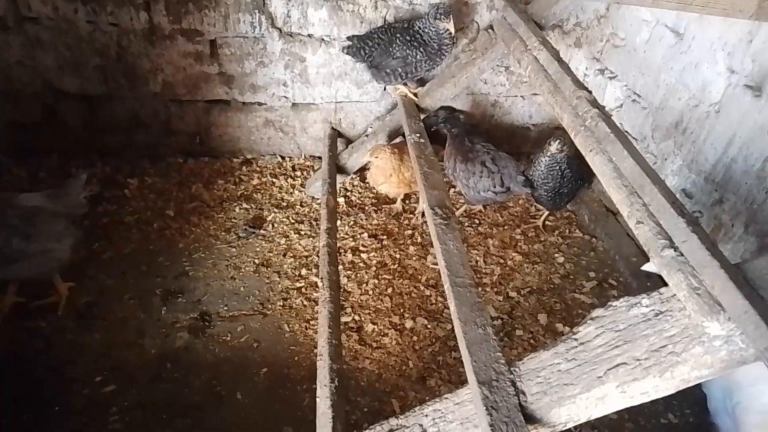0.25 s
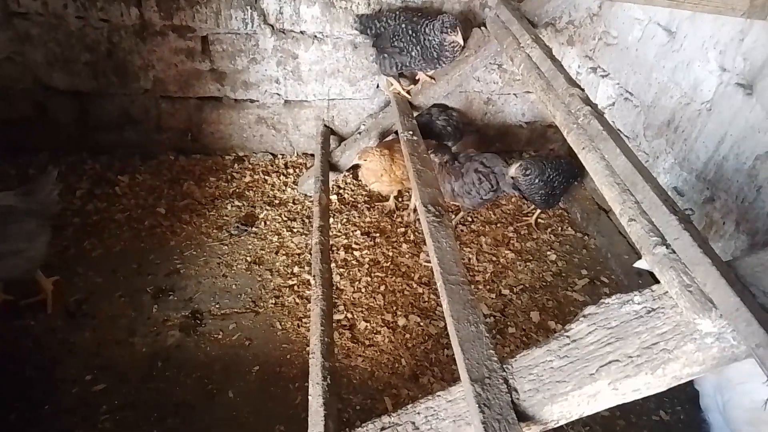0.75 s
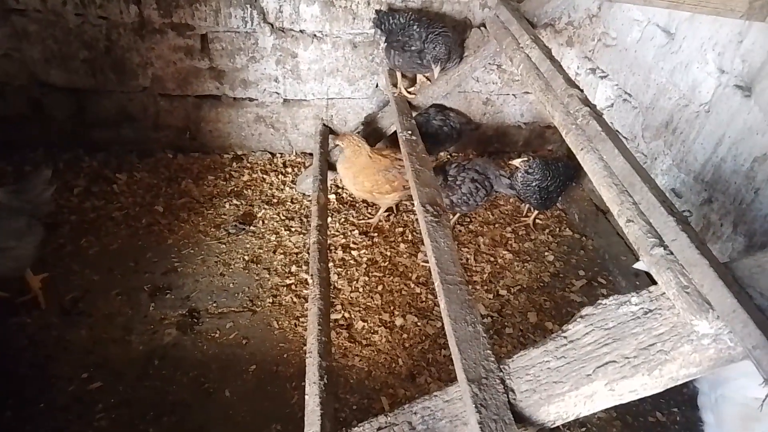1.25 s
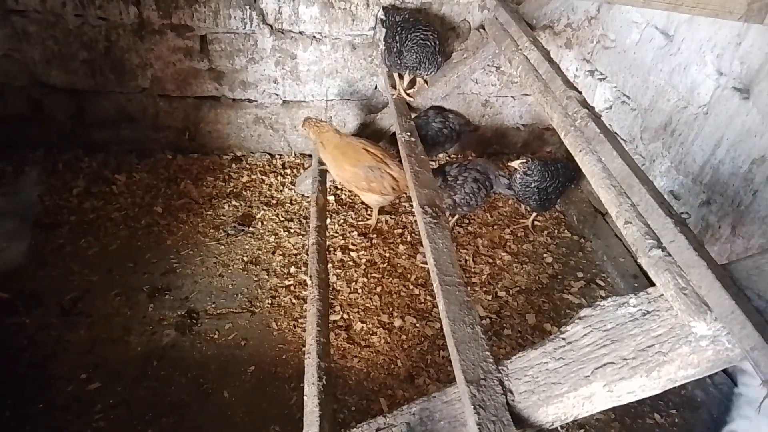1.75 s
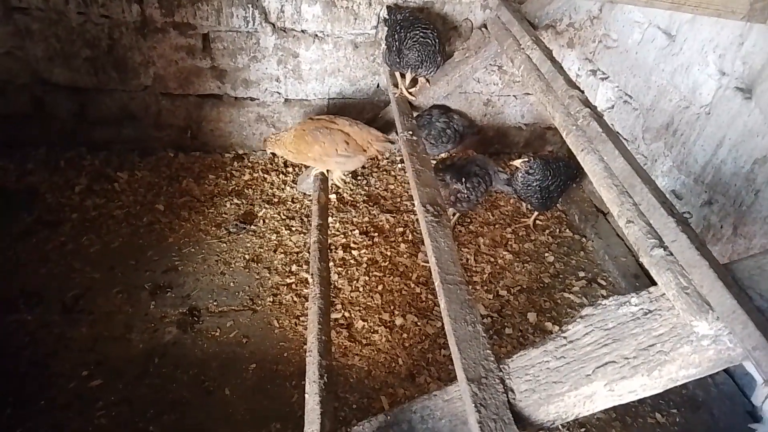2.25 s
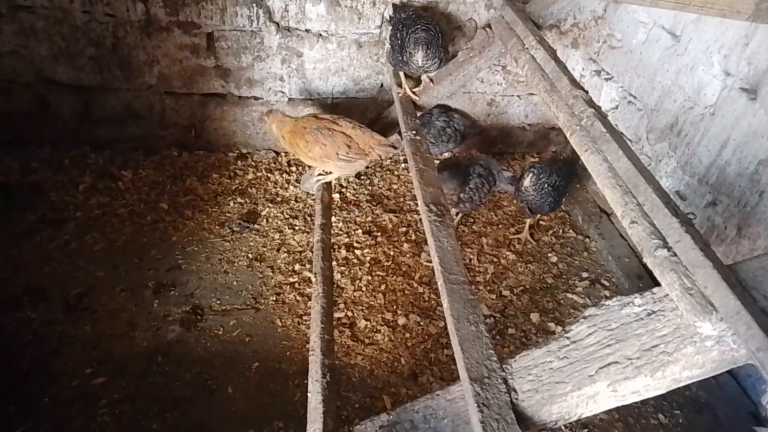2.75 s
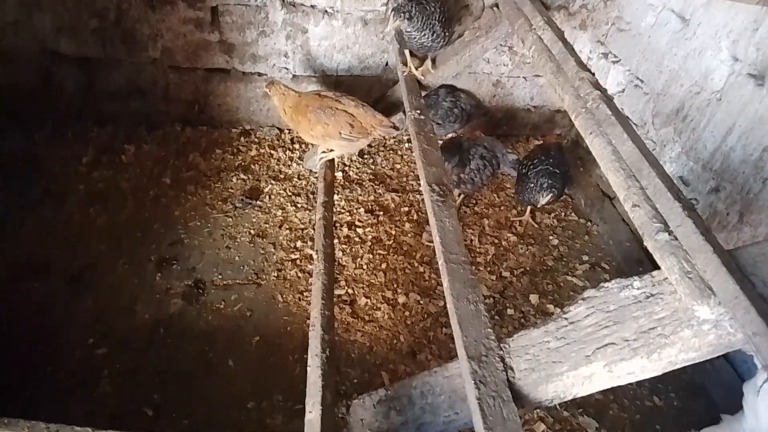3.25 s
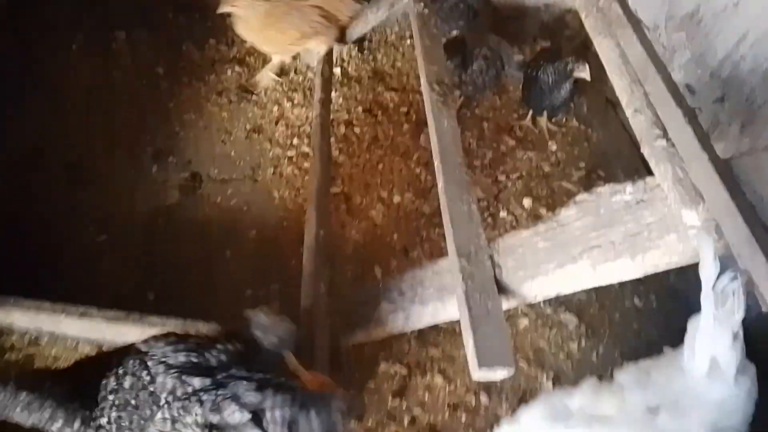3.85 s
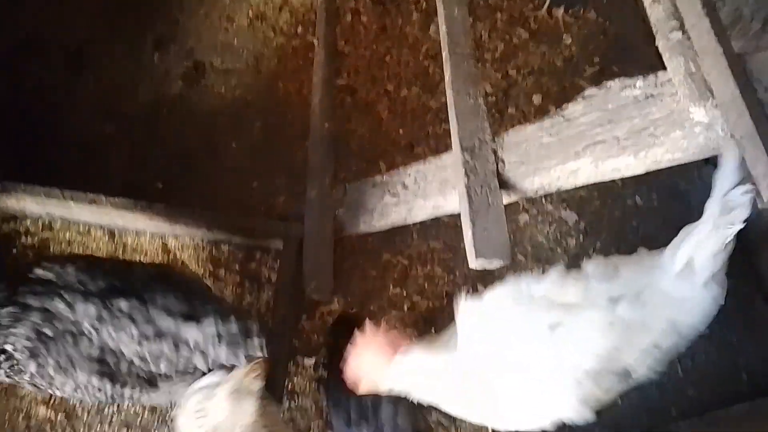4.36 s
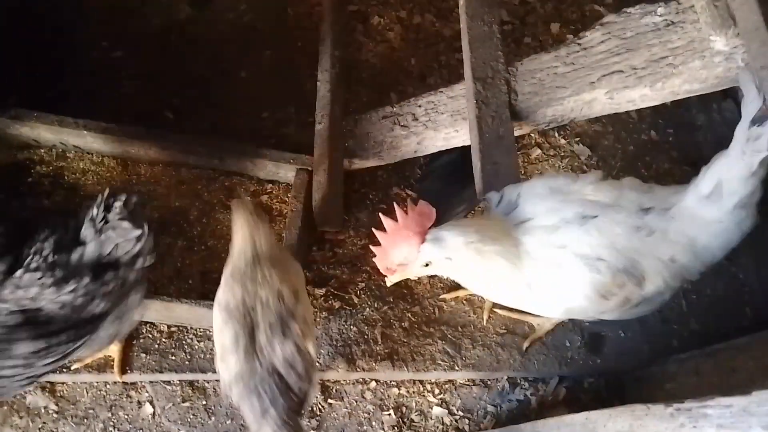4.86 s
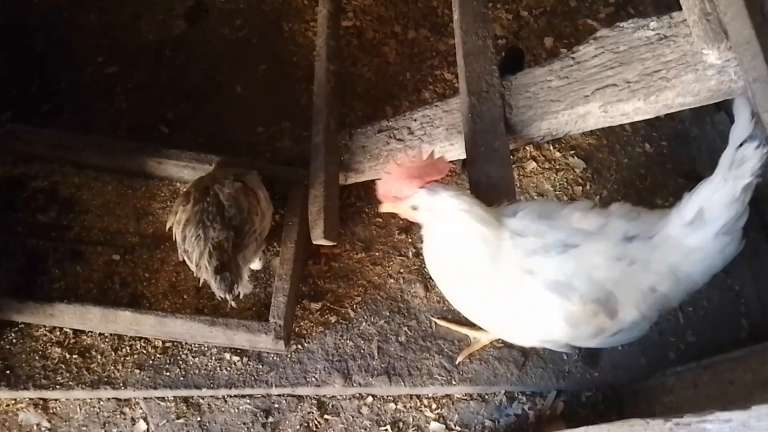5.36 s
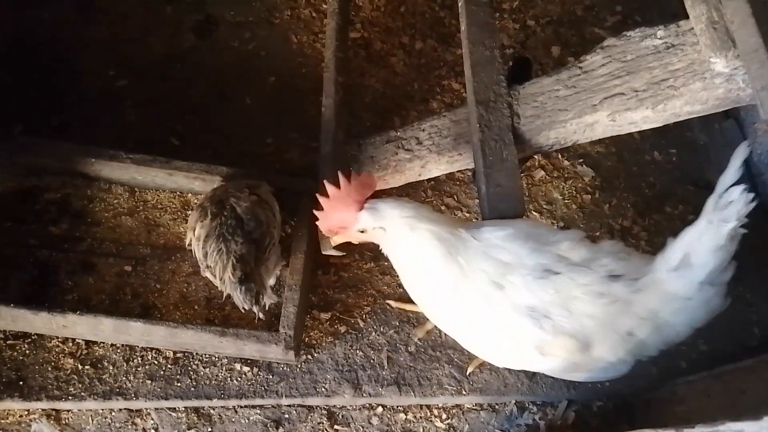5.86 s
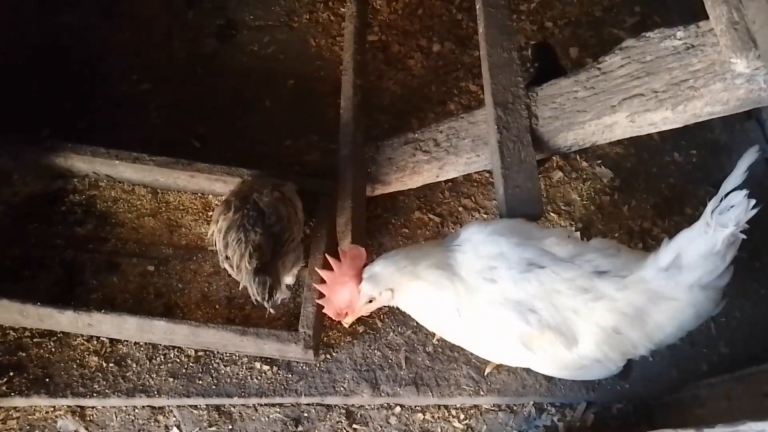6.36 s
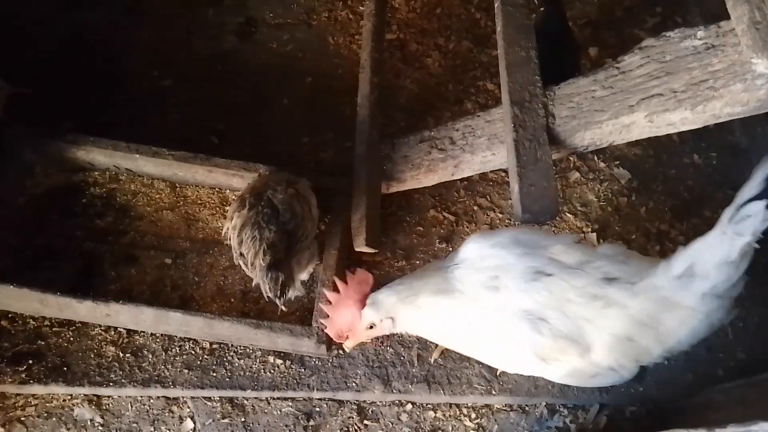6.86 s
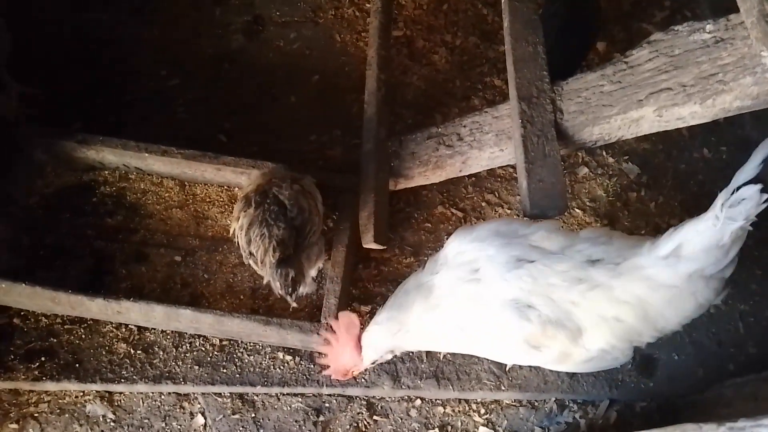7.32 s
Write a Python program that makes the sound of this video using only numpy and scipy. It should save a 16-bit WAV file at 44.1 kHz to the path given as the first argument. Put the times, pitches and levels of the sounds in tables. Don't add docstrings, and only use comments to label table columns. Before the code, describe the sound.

In a small wooden coop, a knock and a quick run of hoarse squawks open, then scattered falling cheeps and low whines over light pecks and knocks. Past the three-second mark the birds get busier, with wing beats, rustling shavings and overlapping peeps, then feet thump a hollow trough. Afterwards it thins to knocks, short cheeps and a feather shake, ending with a faint high buzz. Close hand-held stereo microphone, short wooden ring, occasional handling rumble.

```python
import sys
import numpy as np
from scipy import signal
from scipy.fft import rfft, irfft
from scipy.io import wavfile
from scipy.ndimage import map_coordinates

SR = 44100
rng = np.random.default_rng(int(sys.argv[2]) if len(sys.argv) > 2 else 0)


def how_loud(loudness_db):
    steps = np.asarray(loudness_db, float) / 20
    return 10 ** steps


def dump(signal):
    limited = np.clip(np.atleast_2d(signal).T, -1, 1)
    pcm = np.round(limited * 32767).astype(np.int16)
    wavfile.write(sys.argv[1], SR, pcm)


N = 334719


def at_hz(points, hz):
    return np.interp(np.log(hz), np.log(np.array(points)[:, 0]), np.array(points)[:, 1])


def rms_one(x):
    return x / np.sqrt(np.mean(x ** 2) + 1e-20)


def band(x, low_hz, high_hz):
    return signal.sosfilt(signal.butter(2, [low_hz, high_hz], "band", fs=SR, output="sos"), x)


def drift(rate_hz, size=N):
    r = np.exp(-2 * np.pi * rate_hz / SR)
    run_in = int(SR / rate_hz)
    return rms_one(signal.lfilter([1], [1, -2 * r, r * r], rng.standard_normal(size + run_in))[run_in:])


def ring(clicks, hz, t60_s):
    r, w = how_loud(-60 / (t60_s * SR)), 2 * np.pi * hz / SR
    return signal.lfilter([0, np.sin(w)], [1, -2 * r * np.cos(w), r * r], clicks + 1e-18)


# frequency in Hz, correlation (0-1).
LIKENESS = [(40, 0.97), (300, 0.61), (1500, 0.16), (5000, 0.7), (12000, 0.55)]


def coloured(white, spectrum):
    hz = np.fft.rfftfreq(N, 1 / SR) + 1
    alike = np.clip(at_hz(LIKENESS, hz), 0, 1)
    mid, side = rfft(white) * how_loud(at_hz(spectrum, hz))
    return rms_one(irfft(np.sqrt(1 + alike) * mid + np.sqrt(1 - alike) * side * [[1], [-1]], N))


def patchy(x, depth_db):
    *axes, cells = signal.stft(x, nperseg=512)
    coarse = rng.standard_normal((14, cells.shape[-1] // 5 + 2))
    row = np.sqrt(np.linspace(0, 1, cells.shape[1])) * 13
    column = np.arange(cells.shape[2]) / 5
    places = np.meshgrid(row, column, indexing="ij")
    gain_db = depth_db * map_coordinates(coarse, places, order=1)
    return rms_one(signal.istft(cells * how_loud(gain_db), nperseg=512)[1][:, :N])


def bouts(rows, rise_db_per_s, fall_db_per_s, rest_db):
    t = np.arange(0, N, 32) / SR
    s, hold_s, db = np.transpose(rows)[:, :, None]
    before_s = np.maximum(s - t, 0)
    after_s = np.maximum(t - s - hold_s, 0)
    level_db = db - rise_db_per_s * before_s - fall_db_per_s * after_s
    return np.interp(np.arange(N) / SR, t, np.maximum(level_db.max(axis=0), rest_db))


# frequency in Hz, density in dB per Hz.
AIR = [(15, -45), (25, 0), (127, 0.5), (175, -1), (234, 3), (358, -4.5), (1360, -9), (1770, -8),
       (4260, -25), (6020, -23), (8740, -29), (12700, -19.5), (14500, -19.5)]


def still_air():
    return how_loud(-63 + 1.5 * drift(2.02)) * coloured(rng.standard_normal((2, N)), AIR)


# start in seconds, hold in seconds, level in dB.
HANDLING = [
    (0.02, 0.095, -67),
    (3.1, 0.57, -67.5),
    (3.6, 0.51, -74),
    (4.45, 0.25, -54.5),
    (5.3, .1, -66),
    (5.87, 0.074, -57),
    (6.2, 0.18, -65.5),
    (7.03, 0.12, -63.5),
    (7.33, 0.016, -60),
    (7.54, .05, -59),
]


def handling():
    level_db = bouts(HANDLING, rise_db_per_s=498, fall_db_per_s=108, rest_db=-77)
    return how_loud(level_db) * rms_one(band(rng.standard_normal(N), 25, 113)) * np.ones((2, 1))


# start in seconds, hold in seconds, level in dB.
BUMPS = [(1.95, 0.019, -55.5), (2.18, 0.038, -58), (2.55, .01, -70), (3.05, 0.4, -72), (3.43, 0.48, -58),
         (4.06, 0.79, -52.5), (4.7, 0.011, -41), (4.95, 0.062, -46), (5.26, .005, -52),
         (5.43, 0.065, -49.5), (5.86, 0.079, -47), (6.5, 0.2, -52), (6.9, 0.76, -62)]


def bumps():
    level_db = bouts(BUMPS, rise_db_per_s=498, fall_db_per_s=108, rest_db=-68)
    white = rng.standard_normal(N)
    boom = rms_one(ring(white, 130.5, 0.091)) + 0.82 * rms_one(band(white, 101.0, 217))
    return how_loud(level_db - 4.5) * rms_one(boom) * np.ones((2, 1))


# time in seconds, level in dB.
BUZZ = [
    (7.43, -88),
    (7.53, -55),
    (7.59, -60),
]


def buzz():
    t = np.arange(N) / SR
    throb = how_loud(6.3 * np.sin(2 * np.pi * 68 * t))
    hiss = rms_one(band(band(rng.standard_normal((2, N)), 10300, 13000), 11400, 13200) * throb)
    s, db = np.transpose([(BUZZ[0][0] - .03, -99)] + list(BUZZ))
    return hiss * how_loud(np.interp(t, s, db) + 7.5)


# start in seconds, hold in seconds, level in dB.
STIR = [(0.03, 0.0024, -65.5), (0.21, 0.16, -69.5), (0.588, 0.0047, -70), (0.64, 0.2, -71),
        (0.86, 0.049, -63), (1.07, 0.02, -66.5), (1.17, 0.214, -73.5), (2.53, 0.0028, -65),
        (3.21, 0.023, -70.5), (3.38, .06, -78), (3.7, 0.078, -60.5), (3.8, 0.16, -60.5),
        (3.95, 0.038, -54.5), (4.11, 0.16, -61.5), (4.385, 0.036, -53), (4.47, 0.05, -53.5),
        (4.56, 0.15, -57.5), (4.84, 0.099, -61), (5.06, 0.039, -67.5), (5.24, 0.038, -61),
        (3.62, 1.33, -66.5), (5.0, 0.15, -72.5), (5.71, 0.02, -69.5), (5.86, 0.083, -70),
        (5.95, 0.0029, -60.5), (6.19, 0.086, -72), (6.345, 0.13, -62.5), (6.49, .02, -64),
        (6.595, 0.0044, -57.5), (6.66, 0.085, -68.5), (6.87, 0.0023, -69.5)]
# frequency in Hz, density in dB per Hz.
RUSTLE = [(500, 2), (1500, -1), (3000, 2.5), (6000, 4.5), (7500, -3), (10000, -6), (14500, -11)]


def rustle():
    level_db = bouts(STIR, rise_db_per_s=1100, fall_db_per_s=214, rest_db=-82)
    sizes = how_loud(3.8 * np.minimum(rng.exponential(1, (2, N)), 5))
    struck = rng.random(N) < 1500.0 / SR
    grains = rng.standard_normal((2, N)) * (2.5 + sizes * struck)
    return how_loud(level_db + 12 + 1.5 * drift(40.0)) * patchy(coloured(grains, RUSTLE), depth_db=5)


# start in seconds, hold in seconds, level in dB.
SHAKES = [
    (.585, .012, -62),
    (5.235, .05, -62),
    (3.66, 0.35, -61),
    (5.4, 0.021, -66),
    (6.58, 0.036, -53),
    (6.66, 0.085, -60.5),
    (6.86, 0.021, -70),
]


def feathers():
    level_db = bouts(SHAKES, rise_db_per_s=1100, fall_db_per_s=214, rest_db=-93)
    white = rng.standard_normal((3, N))
    grain = how_loud(4 * drift(150.0))
    barbs = band(white[0] + .7 * white[1:], 6500, 14500)
    return how_loud(level_db) * patchy(barbs * grain, depth_db=4)


# time in seconds, peak in dB.
SCRATCHES = [(0.586, -35), (1.885, -44), (2.024, -41), (2.129, -43.5), (2.277, -48), (2.5273, -33),
             (3.0524, -39), (3.75, -27), (4.098, -31.5), (4.376, -35), (4.702, -28), (5.231, -27.5),
             (5.597, -36), (5.9656, -37), (6.353, -30), (6.401, -26), (6.6, -34)]


def scratches():
    hits = np.zeros(N)
    s, db = np.transpose(SCRATCHES)
    hits[np.round(s * SR).astype(int)] = how_loud(db - 11.5)
    dying = signal.lfilter([1], [1, -how_loud(-60 / (0.051 * SR))], hits)
    return band(band(dying * rng.standard_normal(N), 1500, 8100), 1500, 10900)


# time in seconds, peak in dB, thud pitch in Hz, sharpness in dB.
KNOCKS = [(0.117, -28, 460, -15.5), (.6, -46, 494, -15), (.775, -47.5, 520, -7), (0.651, -40, 685, -7.5),
          (0.743, -51, 685, -8), (1.603, -37.5, 561, -13.5), (1.739, -46.5, 900, -31),
          (1.311, -50.5, 493, -3), (1.897, -39.5, 486, -13), (1.956, -43, 750, -38), (2.167, -36, 401, -18),
          (2.277, -46.5, 230, -39), (2.447, -48, 560, -37), (2.544, -28.5, 395, -16.5),
          (2.717, -39.5, 765, -41), (2.812, -44, 229, -40), (3.177, -31, 407, -21),
          (3.381, -26, 670, -16.5), (3.509, -26, 460, -18.5), (3.578, -35, 607, -12),
          (3.749, -43.5, 530, -4), (3.805, -35.5, 715, -12), (3.989, -43, 234, -38), (4.69, -31, 480, -12),
          (4.929, -36.5, 158, -11), (4.944, -30, 570, -14), (5.064, -35.5, 684, -13),
          (5.233, -27, 674, -11.5), (5.361, -41.5, 930, -11), (5.429, -34.5, 272.5, -44),
          (5.455, -41.5, 515, -29), (5.51, -46.5, 490, -17), (5.853, -34.5, 118.5, -42),
          (5.912, -30.5, 112.5, -40), (0.8, -44.5, 472, -10), (0.899, -49.5, 476, -12),
          (2.546, -36.5, 222, -40), (3.18, -41.5, 221, -35), (4.462, -33, 427, -14), (3.3, -50, 1099, -30),
          (6.344, -36.5, 1090, -8), (6.602, -35, 243, -43), (6.87, -39.5, 287, -39), (7.335, -48, 1260, -8)]


def knocks():
    out, t = np.zeros(N + SR), np.arange(SR // 5) / SR
    noise = rng.standard_normal((len(KNOCKS), len(t)))
    for (s, db, hz, sharp_db), grit in zip(KNOCKS, noise):
        push = np.sin(2 * np.pi * hz * t) * how_loud(-60 * t * hz / 22.0) * np.minimum(t * hz / 1.12, 1)
        shaken = rms_one(band(grit, 0.61 * hz, 1.32 * hz))
        shaken *= how_loud(-11.0 - 60 * t / 0.24) * np.minimum(t / 0.0038, 1)
        crunch = rms_one(band(grit[::-1], 750, 2030))
        crunch *= how_loud(sharp_db - 4.0 - 60 * t / 0.29) * np.minimum(t / 0.00052, 1)
        at = round(s * SR)
        out[at:at + len(t)] += how_loud(db - 1.0) * (push + shaken + crunch)
    return out[:N]


# time in seconds, peak in dB, upper modes in dB, pitch in Hz.
TROUGH_HITS = [(3.581, -36.5, -21, 557), (3.75, -40.5, -16, 542), (4.099, -44, -22, 538),
               (4.212, -43.5, -21, 524), (4.325, -47, -30, 540), (4.392, -43, -18, 547),
               (4.461, -22, -30, 536.6), (4.498, -32, -30, 544), (4.525, -33, -28, 540),
               (4.555, -27.5, -5, 538), (4.57, -28.5, -7, 529.5), (4.6155, -16, -9, 540),
               (4.654, -32, -12, 556), (4.665, -32, -18, 555), (4.72, -40.5, -20, 545),
               (4.799, -26, -33, 534), (4.812, -29, -34, 523.7), (4.845, -39, -30, 520),
               (4.865, -39.5, -30, 520), (5.232, -31, -22, 556.4), (5.262, -32.5, -22, 547)]
# multiple of its pitch, level in dB, t60 in seconds.
TROUGH_MODES = [(1, 1, 0.083), (1.03, -11, .25), (.76, -16, 0.046), (1.34, -12, 0.062), (1.66, -16.5, .05),
                (2.72, -2.5, 0.1), (3.6, -8, .04)]


def trough():
    out, t = np.zeros(N + SR), np.arange(SR // 3) / SR
    chance = rng.standard_normal((len(TROUGH_HITS), len(TROUGH_MODES)))
    noise = rng.standard_normal((len(TROUGH_HITS), len(t)))
    multiple, mode_db, t60_s = np.transpose(TROUGH_MODES)[:, :, None]
    swell = np.sin(np.minimum(t / .009, 1) * np.pi / 2) ** 2
    for (s, db, upper_db, hz), luck, grit in zip(TROUGH_HITS, chance[:, :, None], noise):
        strength_db = mode_db + upper_db * (multiple > 2) + 3 * luck * (multiple != 1)
        mode = np.sin(2 * np.pi * hz * multiple * t + luck) * how_loud(strength_db - 60 * t / t60_s)
        rattle = rms_one(band(grit, 333, 1780)) * how_loud(-18.5 - 60 * t / 0.22)
        at = round(s * SR)
        out[at:at + len(t)] += how_loud(db + 2.5) * swell * (np.sum(mode, axis=0) + rattle)
    return out[:N] * how_loud(drift(60.0))


# frequency in Hz, level in dB.
OVERTONES = [(2000, -39), (4200, -29), (5200, -20.5), (6300, -13), (7500, -28.5), (9500, -29.5),
             (15000, -43)]


def whistles(notes, waver_share, flutter_db, waver_hz, rich_db):
    port_lag_s = 3.5e-5
    opposite = np.array([[1], [-1]])
    out = np.zeros((2, N))
    waver, flutter = drift(waver_hz), np.clip(drift(120.0), -2, 1)
    breath = drift(450.0)
    chance = rng.standard_normal((len(notes), 3))
    for note, (side, lag, beak) in zip(notes, chance):
        s, hz, db = np.transpose(note)
        span = np.arange(int(s[0] * SR), min(int(s[-1] * SR), N))
        t = span / SR
        other = (span + int(1e4 * beak)) % N
        pitch = np.interp(t, s, hz) * (1 + waver_share * waver[other])
        lag_s = np.clip(lag, -1, 1) * port_lag_s * opposite
        phase = 2 * np.pi * (np.cumsum(pitch) / SR + pitch * lag_s)
        edge = np.clip(np.minimum((t - s[0]) / .007, (s[-1] - t) / .006), 0, 1)
        effort_db = np.interp(t, s, db)
        bright_db = rich_db + 0.083 * (effort_db + 15.0)
        tone = np.sin(phase)
        for k in (2, 3):
            overtone_db = at_hz(OVERTONES, k * pitch) + bright_db - 8.4 * (k - 2)
            tone = tone + how_loud(overtone_db) * np.sin(k * phase)
        level = how_loud(effort_db + 4.5 + flutter_db * flutter[other]) * np.sin(edge * np.pi / 2) ** 2
        hoarse = 1 + 12 * waver_share * waver[::-1][other] + .4 * breath[other]
        out[:, span] += tone * hoarse * level * how_loud((.4 + side) * opposite)
    return out


# share of length, share of glide done, level in dB.
ARCH = [(0, 0.0053, -3), (0.519, 0.58, 0), (1, 0.97, -7.5)]
SWELL = [(0, 0, -3.5), (0.547, 0.42, -4.5), (1, 1, 4)]
FADE = [(0, 0.031, 1.5), (0.448, 0.68, -4), (1, 0.86, -15)]
HOOK = [(0, .35, -9), (.22, 0.011, -2), (0.621, .48, 1.5), (1, 1, -5.5)]


def shaped(rows, shape):
    share, glided, step_db = np.transpose(shape)
    return [np.transpose([s + length_s * share, from_hz + (to_hz - from_hz) * glided, db + step_db])
            for s, length_s, from_hz, to_hz, db in rows]


# start in seconds, length in seconds, start pitch in Hz, end pitch in Hz, level in dB.
RASPS = [(0.24, 0.095, 4100, 3940, -55), (0.6, 0.056, 3400, 2270, -60.5), (2.51, 0.09, 3350, 2020, -55),
         (3.33, 0.061, 3800, 3600, -54), (3.8, .06, 3200, 2300, -57), (4.42, .035, 2100, 1890, -45),
         (3.89, 0.042, 2180, 2130, -50), (5.53, 0.111, 1760, 1850, -59), (7.045, 0.172, 1297, 1252, -75.5),
         (3.39, 0.1, 2960, 2700, -51), (3.4, .08, 3600, 3010, -54), (4.42, 0.033, 1200, 1097, -51),
         (5.9, 0.16, 1750, 1630, -64), (4.395, 0.07, 2750, 2600, -41.5), (4.455, 0.065, 2870, 2900, -35.5),
         (4.795, 0.038, 3300, 3230, -46.5)]
SQUAWKS = [
    (0.203, 0.041, 3080, 3050, -42),
    (0.233, 0.03, 2896, 2810, -41.5),
    (0.262, 0.031, 2856, 2975, -42),
    (0.29, 0.029, 2910, 3000, -43),
    (.315, .03, 3100, 3220, -47),
    (3.41, 0.077, 2530, 2315, -50),
    (4.5, 0.062, 2547, 2350, -43),
    (4.82, 0.089, 2750, 2500, -41),
    (4.825, .07, 3350, 3000, -46),
]


def hoarse_notes():
    notes = shaped(RASPS, ARCH) + shaped(SQUAWKS, FADE)
    return whistles(notes, waver_share=0.06, flutter_db=3.5, waver_hz=160.0, rich_db=11)


# start in seconds, length in seconds, start pitch in Hz, end pitch in Hz, level in dB.
WHINES = [(1.03, 0.054, 2304, 2060, -48.5), (1.073, 0.18, 1900, 1916, -56), (1.08, 0.085, 1300, 1460, -56),
          (1.218, 0.049, 1640, 1700, -44), (1.24, 0.09, 2150, 2100, -58), (1.66, 0.063, 1800, 2040, -57.5),
          (1.09, 0.13, 1700, 1500, -54.5), (1.45, 0.0364, 1770, 1600, -65), (1.6, .15, 1800, 2100, -75),
          (1.88, .02, 2300, 2300, -53.5), (1.88, 0.047, 1049, 1053, -54.5), (2.055, 0.051, 1063, 1040, -64),
          (6.41, 0.036, 1420, 1320, -52.5), (4.275, 0.091, 722, 660, -57.5), (3.94, 0.035, 5500, 3900, -57)]
# time in seconds, pitch in Hz, level in dB.
DRAWN_OUT = [
    [(1.55, 2738, -69), (1.75, 2466, -59), (1.86, 2680, -53), (1.92, 3100, -64.5)],
    [(3.4, 1538, -48), (3.417, 1500, -62), (3.428, 1480, -51), (3.45, 1374, -43), (3.5, 1372, -58),
     (3.6, 1344, -65.5), (3.67, 1362, -59.5), (3.85, 1331, -61.5), (4.165, 1375, -54.5),
     (4.195, 1292, -39.5), (4.235, 1167, -61)],
]


def whines():
    notes = shaped(WHINES, ARCH) + DRAWN_OUT
    return whistles(notes, waver_share=0.01, flutter_db=3.0, waver_hz=104.0, rich_db=4.0)


# start in seconds, length in seconds, start (hooked: top) pitch in Hz, end pitch in Hz, level in dB.
PEEPS = [(0.172, 0.061, 4420, 4280, -51), (0.183, 0.029, 4950, 4300, -55), (0.367, 0.018, 6400, 6240, -48),
         (1.44, 0.029, 4500, 4660, -56), (5.862, 0.045, 4830, 4800, -76), (4.77, 0.028, 4150, 4200, -57),
         (4.77, 0.04, 4800, 4770, -58), (3.198, 0.115, 3900, 2770, -42.5),
         (3.945, 0.032, 4900, 5100, -52.5), (3.72, .045, 4200, 4000, -53), (4.37, 0.055, 3400, 3850, -49.5),
         (.835, 0.041, 4600, 3900, -54), (3.132, .025, 3600, 3600, -58.5), (3.165, .03, 2750, 2600, -60),
         (1.46, 0.11, 2356, 2360, -60), (2.93, 0.052, 3843, 2720, -53.5), (3.94, 0.048, 3550, 2490, -42),
         (5.69, 0.083, 3056, 2136, -51), (6.128, 0.027, 3640, 3530, -48), (6.385, .15, 3836, 2046, -45),
         (6.56, 0.11, 4270, 2915, -44), (6.565, 0.044, 3950, 3200, -54), (6.4, 0.0413, 3890, 3300, -47),
         (7.538, 0.042, 3790, 3650, -54)]
PUSHED = [
    (6.18, 0.03, 3790, 2920, -47),
    (2.945, 0.035, 4600, 4540, -51),
    (3.15, 0.036, 4868, 4560, -50),
    (3.18, 0.045, 3680, 2680, -44),
    (3.61, 0.072, 4880, 4890, -50),
    (5.855, 0.0554, 3820, 3470, -53.5),
    (5.855, 0.11, 3380, 2300, -53.5),
    (6.465, 0.039, 3800, 2700, -42.5),
]
TRAILING = [(0.395, 0.055, 2310, 2198, -44), (0.38, .06, 4710, 4520, -57), (0.915, 0.056, 2690, 2360, -43),
            (1.11, 0.079, 2620, 2680, -55.5), (1.43, 0.029, 3100, 4060, -47.5),
            (1.465, 0.065, 3910, 2286, -40.5), (2.985, 0.063, 3850, 2334, -41.5),
            (3.385, 0.059, 4460, 4000, -47), (3.395, 0.085, 3860, 3120, -46),
            (3.61, 0.042, 3860, 3260, -49), (3.645, 0.048, 2760, 2570, -44.5),
            (3.86, 0.031, 2485, 2425, -38), (3.955, 0.074, 2464, 2657, -42),
            (4.187, 0.087, 3140, 2865, -45), (4.225, 0.042, 2540, 2195, -42),
            (4.87, 0.11, 3830, 2270, -44.5)]
HOOKED = [
    (1.278, 0.093, 3650, 2080, -42.5),
    (2.768, 0.089, 4060, 2286, -47.5),
    (3.835, 0.045, 3840, 2700, -47),
    (4.355, 0.065, 3950, 2900, -47),
]
# time in seconds, pitch in Hz, level in dB.
BENT = [
    [(4.45, 3250, -41), (4.47, 3200, -41), (4.49, 3050, -35), (4.51, 3000, -40.5), (4.53, 2920, -47)],
    [(4.395, 2837, -44), (4.42, 2695, -37.5), (4.44, 2585, -40), (4.46, 2500, -45)],
    [(4.485, 2750, -48), (4.515, 2500, -38), (4.535, 2204, -45.5), (4.56, 1990, -50)],
    [(0.762, 3100, -49), (0.79, 2650, -43), (0.81, 2054, -43.5), (0.84, 2005, -52)],
    [(0.057, 3150, -54), (0.072, 4000, -64), (0.095, 3580, -45), (0.123, 2600, -43), (0.135, 2490, -69)],
    [(0.355, 3720, -49), (0.368, 3220, -54), (0.39, 3170, -51), (0.4, 2470, -46)],
    [(0.665, 3690, -61), (0.682, 4330, -50), (0.735, 3000, -42), (0.748, 2336, -46.5), (0.77, 2280, -48)],
    [(0.835, 4085, -54), (0.855, 3996, -45.5), (0.878, 3400, -33.5), (0.892, 2650, -36),
     (0.903, 1783, -42.5), (0.912, 1730, -49)],
    [(3.8, 4250, -58), (3.812, 2900, -50), (3.82, 2380, -35.5), (3.832, 2160, -45), (3.845, 2090, -57)],
    [(4.075, 3100, -56), (4.11, 2486, -49.5), (4.135, 2280, -49), (4.16, 2780, -47)],
    [(4.148, 4050, -50), (4.17, 4460, -50), (4.188, 4450, -47), (4.2, 3774, -53), (4.24, 3580, -50)],
    [(6.14, 3460, -57), (6.152, 3000, -48), (6.18, 2400, -48), (6.215, 2350, -53.5)],
    [(6.59, 3120, -59), (6.608, 2685, -41), (6.62, 2166, -47.5), (6.64, 2140, -59)],
    [(7.335, 3440, -69), (7.348, 2780, -61), (7.362, 2530, -48), (7.38, 2160, -60)],
    [(7.54, 2890, -58), (7.558, 2650, -54), (7.575, 2296, -46), (7.59, 2220, -43)],
    [(7.555, 3340, -56), (7.57, 3030, -57), (7.59, 2550, -41)],
]


def cheeps():
    notes = shaped(PEEPS, ARCH) + shaped(PUSHED, SWELL) + shaped(TRAILING, FADE) + shaped(HOOKED, HOOK) + BENT
    return whistles(notes, waver_share=0.0217, flutter_db=4.0, waver_hz=153.0, rich_db=-1)


# level in dB, t60 in seconds.
COOP = [
    (-.5, 0.08),
    (-8, 0.24),
]


def coop(x):
    t = np.arange(SR // 2) / SR
    echoes = 0
    for level_db, t60_s in COOP:
        part = rng.standard_normal((2, len(t))) * how_loud(-60 * t / t60_s) * (t > .0015)
        echoes = echoes + how_loud(level_db) * part / np.sqrt(np.sum(part ** 2, axis=1, keepdims=True))
    echoes = echoes + 0.19 * band(echoes[::-1], 30, 520)
    return x + signal.fftconvolve(x, echoes, axes=1)[:, :N]


def scene():
    birds = cheeps() + whines() + hoarse_notes()
    to_left = how_loud([[.9], [-.9]])
    blows = knocks() * to_left
    near = birds + 0.61 * blows + scratches() * to_left
    foot = trough()
    hollow = np.array([foot, np.roll(foot, 6)]) * how_loud([[1.0], [-1.0]])
    wet = coop(near + .25 * hollow)
    direct = .9 * hollow + 0.43 * blows
    around = still_air() + handling() + bumps() + buzz() + rustle() + feathers()
    return wet + direct + around


def low_pass(x):
    return signal.sosfilt(signal.butter(12, 15270, fs=SR, output="sos"), x)


def record(dry):
    cut = signal.sosfilt(signal.cheby2(26, 50, 14370, fs=SR, output="sos"), dry)
    return low_pass(cut)


dry = scene()
out = record(dry)
dump(out)
```